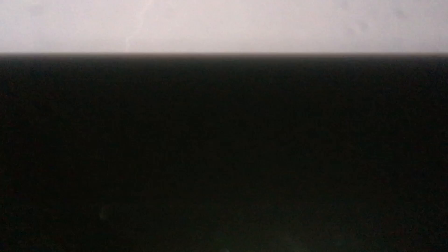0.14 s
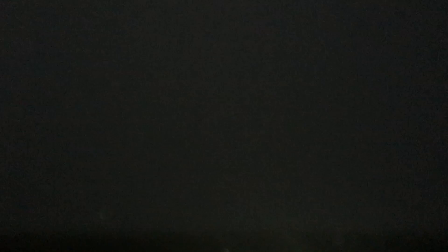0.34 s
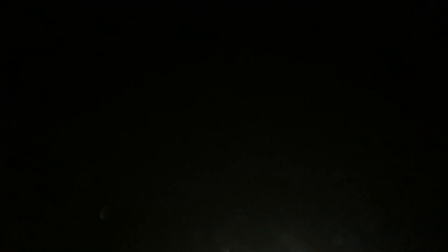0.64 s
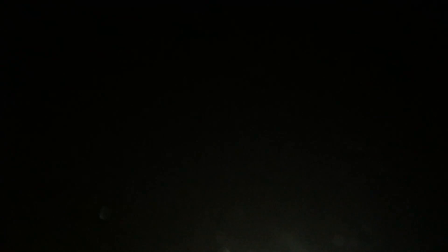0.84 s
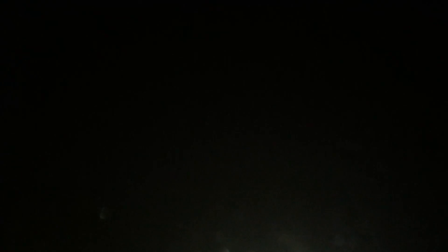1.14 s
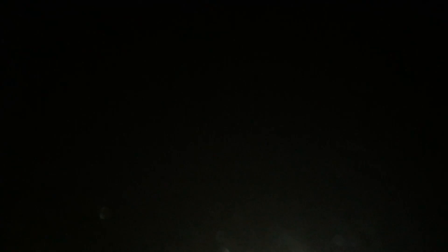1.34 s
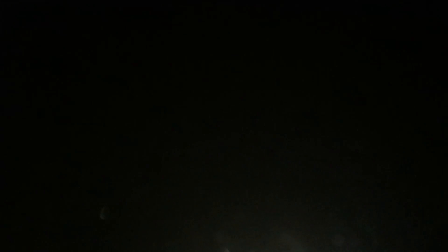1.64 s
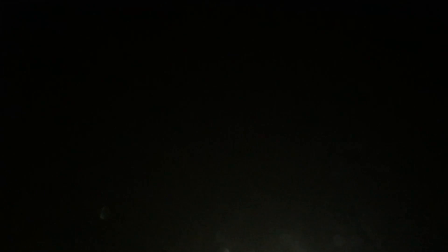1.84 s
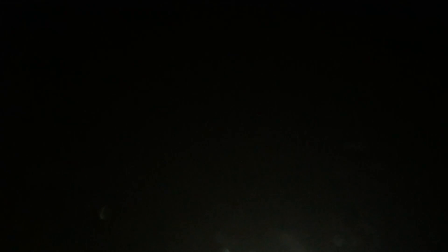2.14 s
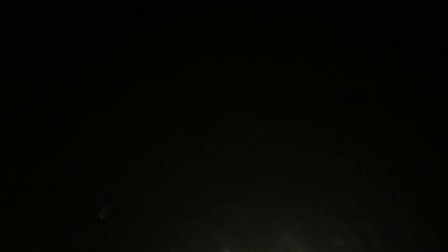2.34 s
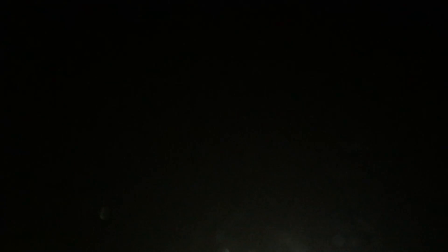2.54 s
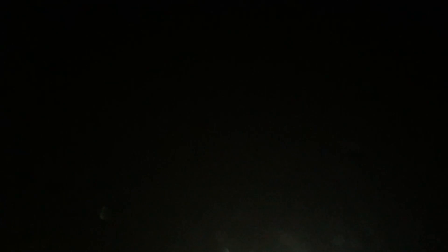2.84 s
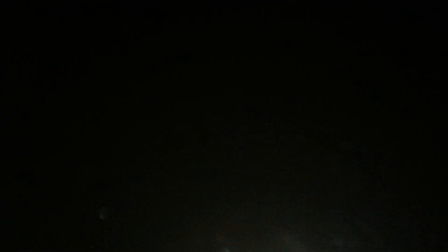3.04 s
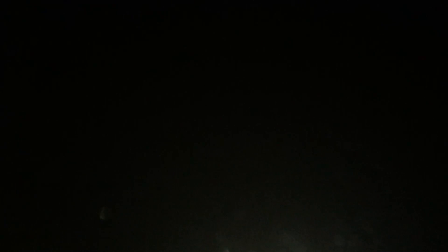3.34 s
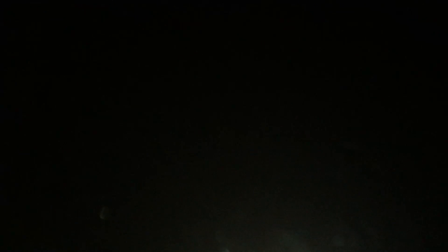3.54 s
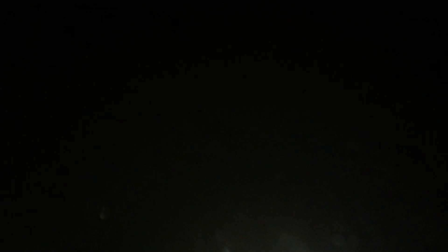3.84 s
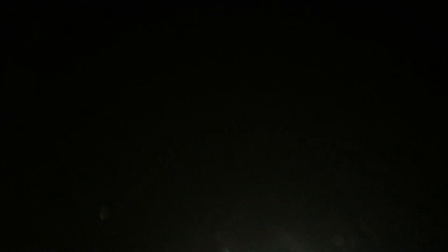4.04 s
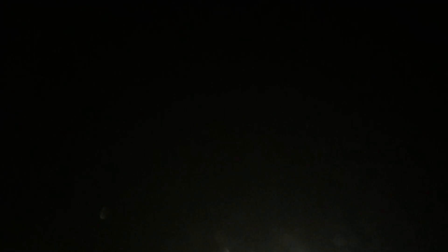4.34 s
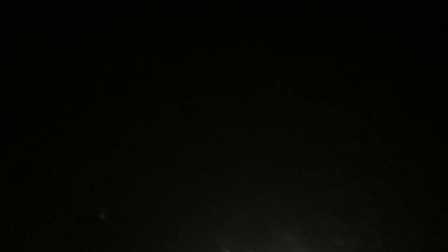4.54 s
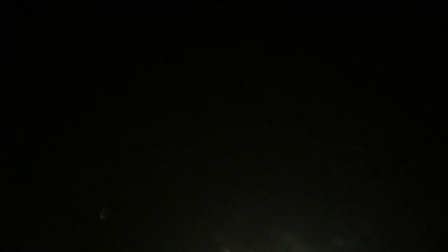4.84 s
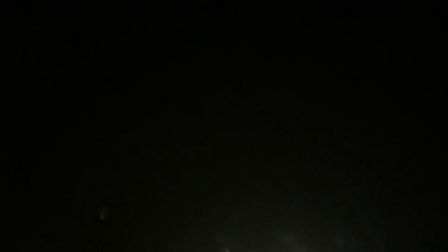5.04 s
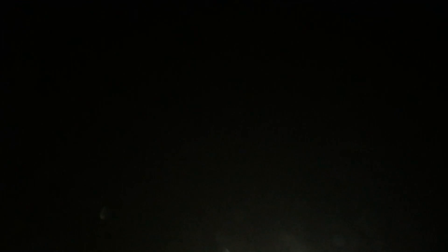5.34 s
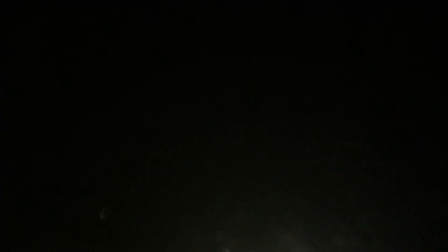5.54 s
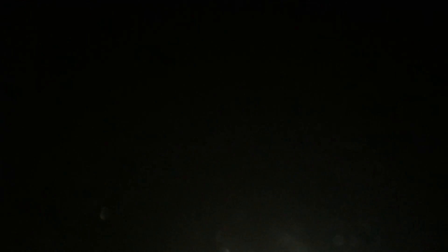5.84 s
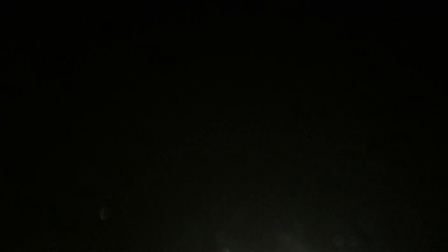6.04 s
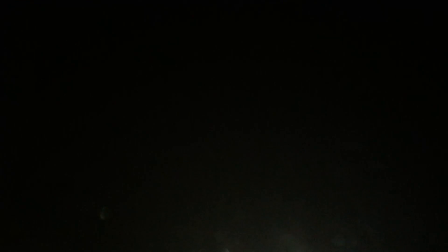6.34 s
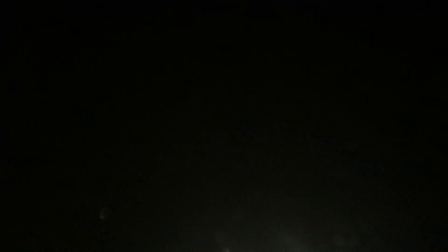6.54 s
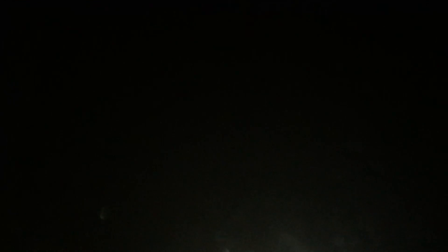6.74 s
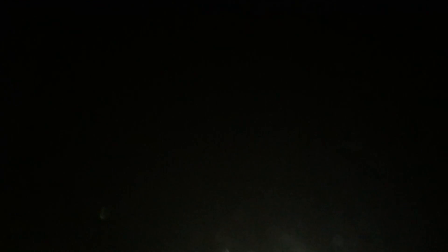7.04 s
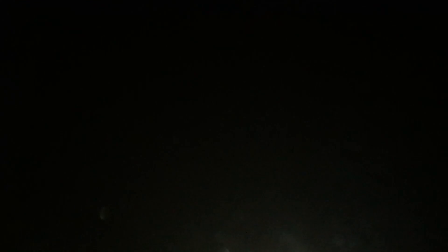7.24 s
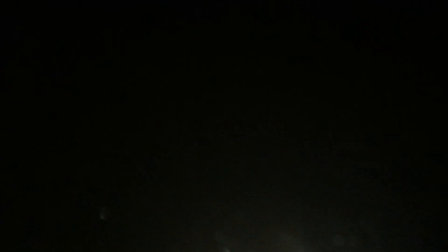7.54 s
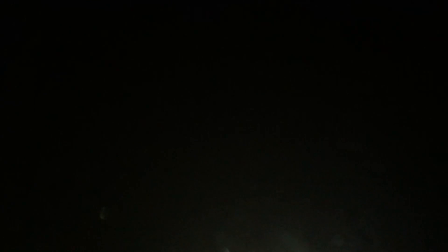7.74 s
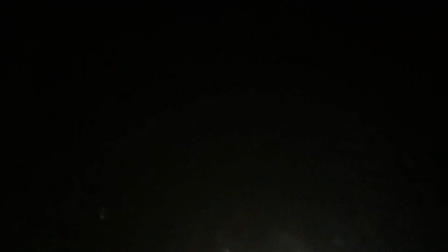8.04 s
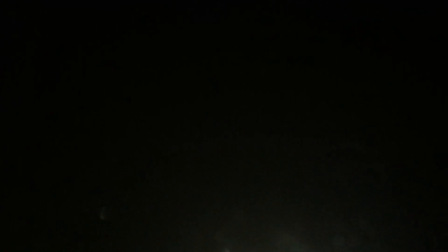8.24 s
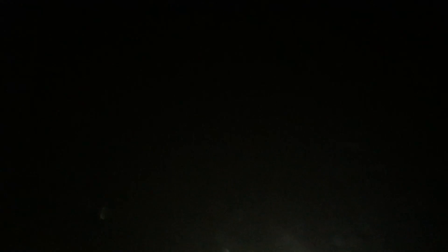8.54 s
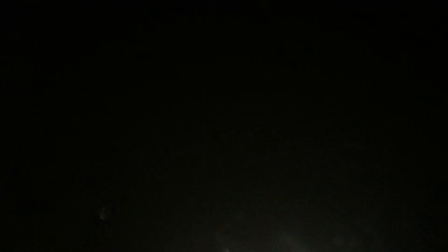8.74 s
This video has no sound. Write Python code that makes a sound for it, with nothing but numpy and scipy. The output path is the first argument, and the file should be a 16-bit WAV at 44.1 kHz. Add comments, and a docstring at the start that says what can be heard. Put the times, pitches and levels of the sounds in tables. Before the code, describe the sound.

Thunder rips and cracks hard over steady pattering rain, tumbles in booming claps, then a second deep, muffled peal rumbles away.

```python
"""Thunder in peals, claps and a distant roll over steady rain, one microphone just inside a window.
The near stroke opens as a tearing crackle, breaks into claps, and a second, duller peal rolls away.
Random shocks make the roll and tear, pressure pulses the claps, and narrow-band noise the room's boom.
Rain is a noise wash with pattering impacts, and a few noise ticks are drops landing close by.
Room modes colour the roll, claps and rain; the recorder's gain gives way a little under loud sound."""
import sys
import numpy as np
from scipy import signal
from scipy.fft import rfft, irfft
from scipy.io import wavfile
from scipy.ndimage import uniform_filter1d

SR = 44100
rng = np.random.default_rng(int(sys.argv[2]) if len(sys.argv) > 2 else 0)


def generate_wav(signal):
    """Clip the signal to [-1, 1] and save it as 16-bit WAV at the path in sys.argv[1]."""
    frames = np.transpose(np.atleast_2d(signal))
    scaled = np.clip(frames, -1, 1) * 32767
    pcm = np.round(scaled).astype(np.int16)
    wavfile.write(sys.argv[1], SR, pcm)


N = 392490
TIME = np.arange(N) / SR  # seconds
BINS = np.maximum(np.fft.rfftfreq(N, 1 / SR), 1)  # Hz


def from_db(db):
    """Decibels to gain."""
    return 10 ** (np.asarray(db) / 20)


def rms_one(x):
    """Scale to unit power."""
    return x / np.sqrt(np.mean(x ** 2) + 1e-20)


def in_time(rows):
    """The columns of a curve, one value a sample."""
    seconds, *columns = np.transpose(rows)
    return [np.interp(TIME, seconds, column) for column in columns]


def butter(x, hz, kind, order=2):
    """Causal low-, high- or band-pass."""
    sos = signal.butter(order, np.clip(hz, 10, .45 * SR), kind, fs=SR, output="sos")
    return signal.sosfilt(sos, x + 1e-18)


def below(x, hz):
    """The part of a signal under a steep crossover, without phase shift."""
    return irfft(rfft(x) / (1 + (BINS / hz) ** 10), N)


def coloured(x, spectrum):
    """Give a white signal a smooth spectrum, drawn over log frequency."""
    hz, db = np.transpose(spectrum)
    gain_db = np.interp(np.log(BINS), np.log(hz), db)
    return irfft(rfft(x) * from_db(gain_db), N)


def resonate(x, modes):
    """Each mode in turn lifts a narrow band and rings on there; a negative one hollows it out."""
    for hz, width_hz, db in modes:
        b, a = signal.iirpeak(hz, hz / width_hz, fs=SR)
        ringing = signal.lfilter(b, a, x + 1e-18)
        x = x + (from_db(db) - 1) * ringing
    return x


def evened(x, span_s):
    """Hold the power near one over the given span, leaving faster grain alone."""
    size = max(int(span_s * SR), 8)
    power = uniform_filter1d(uniform_filter1d(x ** 2, size), size)
    return x / np.sqrt(np.abs(power) + 1e-20)


def impacts(per_s, spread_db):
    """Clicks of either sign at random moments: many small, few large."""
    sizes = from_db(spread_db * np.minimum(rng.exponential(1, N), 5))
    signs = rng.choice([-1, 1], N)
    struck = rng.random(N) < per_s / SR
    return sizes * signs * struck


def scatter(x, t60, wet_db):
    """Direct sound and a cloud of reflections: noise whose power dies by 60 dB in t60 seconds."""
    keep = from_db(-120 / (t60 * SR))  # per-sample factor on power, not amplitude
    power = signal.lfilter([0, 1 - keep], [1, -keep], x ** 2 + 1e-18)
    return x + from_db(wet_db) * np.sqrt(power) * rng.standard_normal(N)


def swell(start_s, hold_s, attack_s, fall_db_per_s):
    """Gain that rises in a straight line, holds, then falls steadily in dB."""
    t = TIME - start_s
    rise = np.clip(t / attack_s, 0, 1)
    fall_db = np.clip(fall_db_per_s * (t - attack_s - hold_s), 0, 150)
    return rise * from_db(-fall_db)


def together(levels_db, swells):
    """Gain of overlapping swells, whose powers add."""
    return np.sqrt(sum((from_db(db) * gain) ** 2 for db, gain in zip(levels_db, swells)))


# Rain heard at the window, a spectrum. Each row: frequency in Hz, relative density in dB.
RAIN_SPECTRUM = [(25, -17), (42, -9), (62, -4), (88, -1.5), (108, 5.5), (130, -9), (270, -8), (480, -18),
                 (640, -9.5), (820, -15.5), (1500, -14.5), (2300, -22.5), (7000, -34.5), (15500, -49.5)]
# Near drops on soft, firm and hard surfaces. Each row: lowest and highest frequency in Hz.
SURFACE_BANDS = [(1000, 2820), (2400, 5350), (5200, 14000)]
# Bands in which the splashing rings. Each row: frequency in Hz, width in Hz, lift or dip in dB.
SPLASH_BANDS = [(905, 62, 3), (1168, 74, 7), (1440, 160, -1.5), (1685, 100, 3), (3160, 420, 3.5),
                (5070, 530, -2), (6230, 640, 4), (8700, 1300, 2.5), (10400, 370, -2.5)]
# Resonances and dips of the room and window recess, for rain and thunder alike.
# Each row: frequency in Hz, width in Hz, lift or dip in dB at full strength.
RECESS_MODES = [(109, 10, 7), (126, 8, -5), (143, 10, 6), (163, 10, 5), (182, 8, 6), (206, 14, -4),
                (228, 10, 7), (264, 13, 9), (365, 22, 6), (441, 8, 9), (527, 8, 8), (587, 18, 12),
                (718, 13, 12), (986, 45, 7), (1128, 70, 7), (1660, 140, 3), (2180, 200, 5)]
WASH_DB, PATTER_DB = -41, -50  # before the resonances


def rain(room_share=0.13):
    """Far drops merge into a wash, nearer ones patter; they stir the room less than thunder does."""
    modes = [(hz, width_hz, db * room_share) for hz, width_hz, db in RECESS_MODES]
    wash = coloured(rng.standard_normal(N), RAIN_SPECTRUM)
    patter = 0
    for low_hz, high_hz in SURFACE_BANDS:
        # each drop rings in the band of what it hits
        hits = scatter(impacts(per_s=450, spread_db=3.3), t60=.08, wet_db=2)
        patter = patter + butter(hits, [low_hz, high_hz], "band")
    patter = coloured(patter, RAIN_SPECTRUM)
    mixed = from_db(WASH_DB) * rms_one(wash) + from_db(PATTER_DB) * rms_one(patter)
    return resonate(mixed, modes + SPLASH_BANDS)


# Distant roll that lies under the peals. Each row: time in seconds, relative level in dB,
# dullness in dB lost from one register to the next.
DISTANT_ROLL = [(0, -47.5, 5), (1.2, -45, 4.5), (1.65, -43, 3), (2.1, -43.5, 0), (2.45, -43, 3.5),
                (3.0, -42.5, -2), (3.3, -35.5, 1.5), (3.75, -29.5, 1), (4.15, -33, 0), (4.6, -30, 4.5),
                (5.05, -32.5, 9), (5.42, -38.5, 5.5), (5.7, -39.5, -2.5), (6.05, -38.5, 3.5),
                (6.44, -36.5, 1), (7.05, -21, 4.5), (7.9, -37, 2), (8.9, -37, 0.5)]
# Peals, one for each stretch of the channel. Each row: start in seconds, hold in seconds,
# relative level in dB, dullness in dB lost per register, relative boom level in dB.
CHANNEL_PEALS = [(1.305, 0.044, -54, 9, -37.5), (1.59, 0.081, -46, -1.5, -43),
                 (1.95, 0.043, -40, 0.5, -37.5), (2.615, 0.021, -30.5, 13, -52),
                 (2.875, 0.032, -36, 7, -35), (3.064, 0.034, -35, 4, -53), (3.126, 0.087, -13, 11, -18.5),
                 (3.324, .02, -18.5, 8, -28), (3.345, 0.01, -12, 5, -18), (3.433, 0.047, -13, 7, -14),
                 (3.517, 0.014, -21, 3, -19), (3.59, 0.053, -17.5, 2.5, -30),
                 (3.838, 0.016, -26.5, 2.5, -26.5), (3.98, .09, -29.5, 2, -25.5),
                 (4.27, 0.066, -23, 1.5, -39), (4.463, 0.018, -25.5, 2, -27), (4.639, .04, -24.5, 2.5, -45),
                 (4.685, 0.039, -21, 5, -21), (4.747, 0.08, -25.5, 3, -19.5), (4.867, 0.075, -31.5, 3, -33),
                 (4.943, 0.035, -28, 10, -45), (4.994, 0.014, -24.5, 4, -42), (5.117, 0.055, -21.5, 8, -33),
                 (5.551, 0.05, -29, 6.5, -52), (5.708, 0.017, -27, 4.5, -27), (5.802, 0.1, -34, 4, -38),
                 (6.225, 0.023, -34, 2, -25.5), (6.476, 0.12, -17.5, 8.5, -20),
                 (6.597, 0.097, -17, 13, -19), (6.743, 0.066, -24, 11, -21.5), (6.9, .05, -26, 13, -25),
                 (6.993, 0.04, -29, 15, -29), (7.09, 0.05, -22, 7, -27), (7.198, 0.067, -23, 5.5, -33),
                 (7.347, 0.034, -20.5, 12, -42), (7.523, 0.079, -27, 7.5, -37),
                 (8.02, 0.13, -30.5, 4, -32.5), (8.19, 0.035, -32.5, 5, -38),
                 (8.307, 0.032, -28.5, 6.5, -52), (8.461, 0.028, -27, 7, -46),
                 (8.62, 0.048, -29.5, 13, -33), (8.762, .1, -52, 7, -28)]
# Thunder across the registers, a spectrum. Each row: frequency in Hz, relative density in dB.
THUNDER_SPECTRUM = [(60, 1), (85, -6.5), (110, -4.5), (160, -2.5), (205, -6.5), (260, -7.5), (400, -6.5),
                    (500, -14), (640, -19.5), (820, -24), (1100, -22), (2200, -35.5), (3000, -45),
                    (7000, -59)]
PEAL_ATTACK_S, PEAL_FALL_DB_PER_S = .011, 212
RUMBLE_DB, ROAR_DB, CRACKLE_DB = -2, -1.5, -4.5  # trims of the low, middle and high register
# later shocks come from farther away, so the air has taken more of their crackle
AIR_LOSS_START_S, AIR_LOSS_DB_PER_S = 3.1, 1.14


def roll():
    """Kinks of the channel send shocks that crowd into peals and lose treble on the way."""
    shocks = scatter(impacts(per_s=1000, spread_db=3.0), t60=0.18, wet_db=-0.5)
    shocks = resonate(coloured(shocks, THUNDER_SPECTRUM), RECESS_MODES)
    deep, low, middle = below(shocks, 51), below(shocks, 267), below(shocks, 780)

    far_db, far_dull_db = in_time(DISTANT_ROLL)
    _, _, peal_db, dull_db, _ = np.transpose(CHANNEL_PEALS)
    swells = [swell(s, hold, PEAL_ATTACK_S, PEAL_FALL_DB_PER_S) for s, hold, *_ in CHANNEL_PEALS]
    gains = []
    for register in range(3):
        far = from_db(far_db - register * far_dull_db)
        near = together(peal_db - register * dull_db, swells)
        gains.append(np.hypot(far, near))

    rumble = from_db(RUMBLE_DB) * gains[0] * evened(low - deep, span_s=0.047)
    roar = from_db(ROAR_DB) * gains[1] * evened(middle - low, span_s=0.046)
    air_db = AIR_LOSS_DB_PER_S * np.maximum(TIME - AIR_LOSS_START_S, 0)
    crackle = from_db(CRACKLE_DB - air_db) * gains[2] * evened(shocks - middle, span_s=0.036)
    return rumble + roar + below(crackle, 3800)


BOOM_HZ, BOOM_WIDTH_HZ = 62, 9
# the mode takes up a peal late and lets go slowly; the distant roll keeps it stirring
BOOM_LAG_S, BOOM_ATTACK_S, BOOM_FALL_DB_PER_S = 0.018, 0.052, 150
BOOM_IN_ROLL_DB = -4  # relative to the distant roll's level


def boom():
    """Peals and distant roll swing the room's lowest mode, heard as a narrow band of noise."""
    band = [BOOM_HZ - BOOM_WIDTH_HZ / 2, BOOM_HZ + BOOM_WIDTH_HZ / 2]
    swing = butter(rng.standard_normal(N + SR), band, "band")[SR:]  # the filter settles for 1 s
    swells = [swell(s + BOOM_LAG_S, hold, BOOM_ATTACK_S, BOOM_FALL_DB_PER_S)
              for s, hold, *_ in CHANNEL_PEALS]
    struck = together([boom_db for *_, boom_db in CHANNEL_PEALS], swells)
    stirred = from_db(in_time(DISTANT_ROLL)[0] + BOOM_IN_ROLL_DB)
    return np.hypot(struck, stirred) * evened(swing, span_s=0.059)


# Rips of the nearest branches. Each row: start in seconds, hold in seconds, level in dB.
BRANCH_RIPS = [(1.596, .04, -44), (1.68, .03, -47), (1.77, .015, -44), (1.855, .015, -41),
               (1.957, .025, -37), (2.09, .04, -42), (2.878, 0.0092, -36.5), (3.076, 0.032, -39.5),
               (3.146, .05, -29), (3.207, 0.0063, -28.5), (3.344, 0.014, -31.5), (3.45, 0.036, -42),
               (3.606, .018, -38), (3.646, .012, -46), (4.275, 0.047, -45), (4.695, 0.039, -46),
               (6.6, .008, -38)]
# Tearing of those branches, a spectrum. Each row: frequency in Hz, relative density in dB.
TEAR_SPECTRUM = [(700, -16), (1200, 3.5), (1500, 4.5), (2200, 4.5), (2800, -8.5), (4300, -14), (7000, -39),
                 (12000, -60)]
RIP_ATTACK_S, RIP_FALL_DB_PER_S = 0.0032, 443


def tear():
    """The closest branches still have sharp fronts: a ripping crackle without the room's modes."""
    snaps = scatter(impacts(per_s=460, spread_db=6.0), t60=0.091, wet_db=1.5)
    snaps = coloured(snaps, TEAR_SPECTRUM)
    swells = [swell(s, hold, RIP_ATTACK_S, RIP_FALL_DB_PER_S) for s, hold, _ in BRANCH_RIPS]
    return together([db for *_, db in BRANCH_RIPS], swells) * evened(snaps, span_s=0.053)


# Big drops close to the microphone. Each row: start in seconds, peak level in dB, centre in Hz.
CLOSE_DROPS = [(1.782, -43, 4000), (5.396, -33, 1140), (8.152, -49, 10900)]


def drips(t60=0.071, width=0.089):
    """A few big drops land close by, each a short dying tick of band-passed noise."""
    out, t = np.zeros(N), TIME[:SR // 10]
    for start_s, peak_db, hz in CLOSE_DROPS:
        burst = rng.standard_normal(len(t)) * from_db(-60 * t / t60)
        tick = butter(burst, [hz / (1 + width), hz * (1 + width)], "band")
        at = int(start_s * SR)
        out[at:at + len(t)] += from_db(peak_db) * tick / np.abs(tick).max()
    return out


# Single strong shocks. Each row: start in seconds, relative peak of the direct pulse in dB,
# length in seconds, sharpness of the front as a low-pass cutoff in Hz.
STRONG_SHOCKS = [(1.969, -25, .0006, 2500), (2.472, -22, 0.00048, 2000), (2.884, -21.5, 0.00037, 2500),
                 (3.132, -9.5, 0.0065, 1100), (3.162, -11, 0.0042, 1900), (3.219, -10.5, 0.00064, 5200),
                 (3.256, -7.5, 0.0055, 300), (3.36, -6, 0.0019, 3000), (3.367, -6, 0.0034, 1600),
                 (3.458, -5.5, .003, 900), (3.611, -11, 0.0018, 4200), (3.616, -11, 0.0015, 3200),
                 (3.644, -5.5, 0.00264, 2300), (4, -9.5, 0.0021, 1400), (4.076, -26, 0.00065, 1600),
                 (4.277, -12, 0.0026, 1410), (4.346, -6.5, 0.0032, 1480), (4.485, -13, 0.0021, 1200),
                 (4.7, -7.5, .001, 1580), (4.72, -8, 0.00286, 1210), (4.734, -8.5, 0.0033, 700),
                 (5.002, -14, .0028, 600), (5.13, -15.5, 0.0019, 900), (5.134, -14.5, .0013, 1000),
                 (5.715, -9.5, .006, 444), (6.487, -7, 0.0056, 350), (6.601, -6, 0.0075, 500),
                 (6.767, -7.5, 0.0056, 400), (6.999, -6, 0.0027, 700), (7.157, -5.5, 0.0029, 690),
                 (7.357, -11, 0.0092, 250)]


def claps(echo_db=-4, echo_t60=0.17):
    """N-shaped pressure pulses and their reflections, fronts rounded by the air they have crossed."""
    out, t = np.zeros(N), TIME[:SR // 5]
    for start_s, peak_db, length_s, front_hz in STRONG_SHOCKS:
        n_wave = (1 - 2 * t / length_s) * (t < length_s)
        pulse = butter(n_wave, front_hz, "low")
        dying = rng.standard_normal(len(t)) * from_db(-60 * t / echo_t60)
        walls = rms_one(dying) / np.sqrt(len(t))  # unit energy
        heard = pulse + from_db(echo_db) * signal.fftconvolve(pulse, walls)[:len(t)]
        at = int(start_s * SR)
        out[at:at + len(t)] += from_db(peak_db) * heard / np.abs(pulse).max()
    return resonate(butter(out, 79, "high"), RECESS_MODES)


THUNDER_DB, CLAP_DB = 0.94, -4  # trims of roll with boom, and of the claps


def scene():
    """Thunder over rain, at one microphone."""
    thunder = from_db(THUNDER_DB) * (roll() + boom()) + tear() + from_db(CLAP_DB) * claps()
    return (thunder + rain() + drips())[None]


def gain_control(x, threshold_db=-29, share=0.14, release_db_per_s=14):
    """Gain drops by a share of the excess level; the held level then falls at the release rate."""
    power = np.abs(uniform_filter1d(x[0] ** 2, SR // 50))  # over 20 ms
    level_db = 10 * np.log10(power + 1e-12)
    release_db = release_db_per_s * TIME
    held_db = np.maximum.accumulate(level_db + release_db) - release_db
    excess_db = butter(np.maximum(held_db - threshold_db, 0), 10, "low", order=1)
    return x * from_db(-share * excess_db)


CUTOFF_HZ = 15700


def record(dry):
    """Gentle gain control, then a steep low-pass cuts the top."""
    top_cut = signal.ellip(10, .1, 80, CUTOFF_HZ, fs=SR, output="sos")
    return signal.sosfilt(top_cut, gain_control(dry))


dry = scene()
out = record(dry)
generate_wav(out)
```